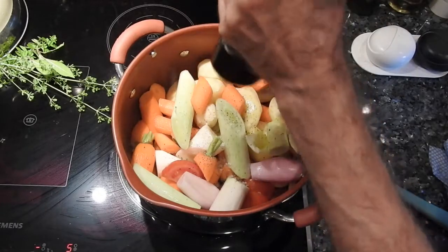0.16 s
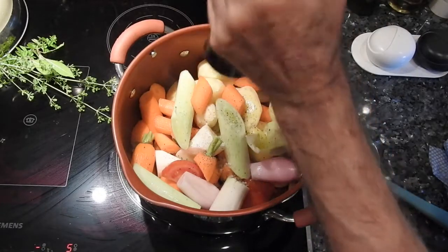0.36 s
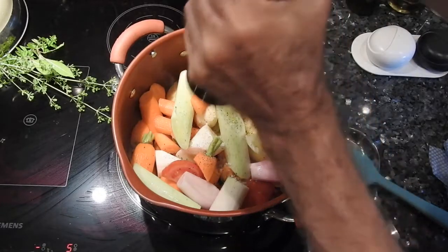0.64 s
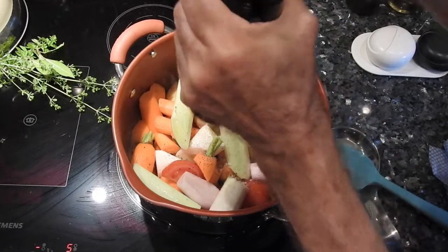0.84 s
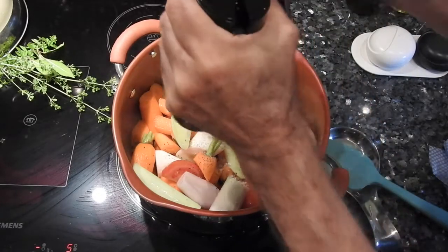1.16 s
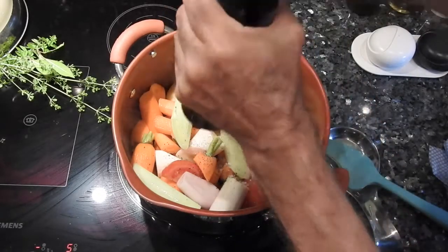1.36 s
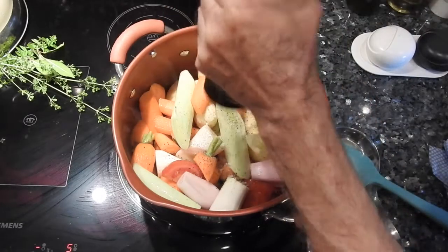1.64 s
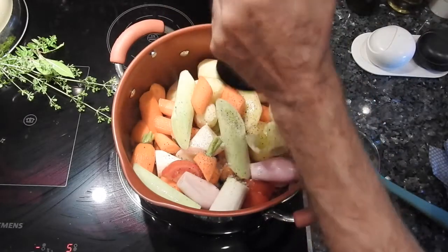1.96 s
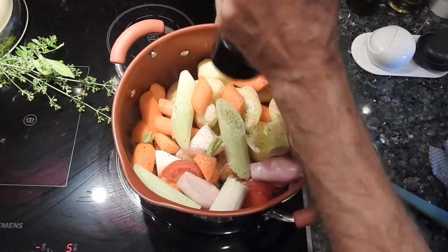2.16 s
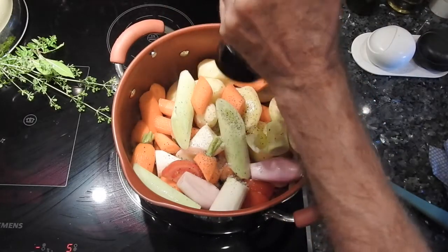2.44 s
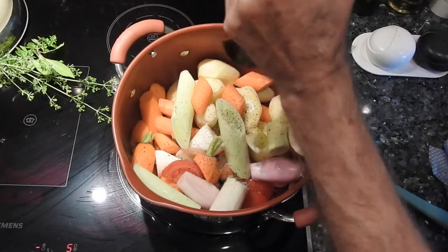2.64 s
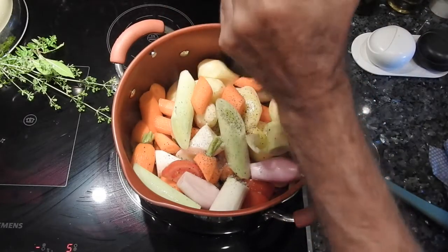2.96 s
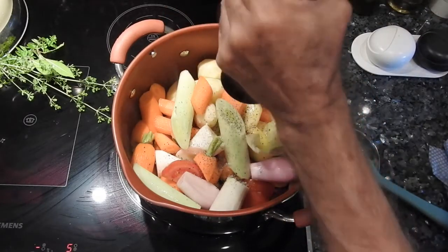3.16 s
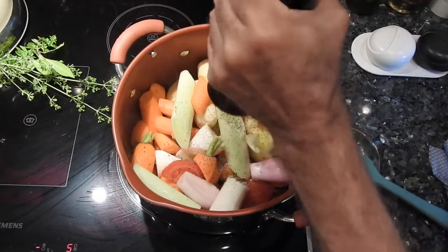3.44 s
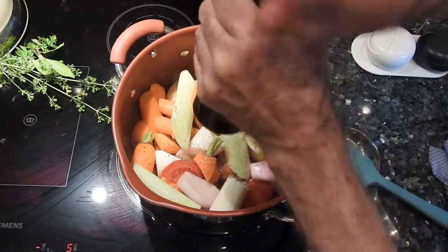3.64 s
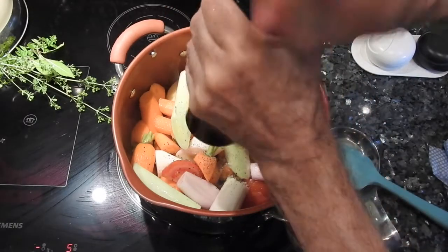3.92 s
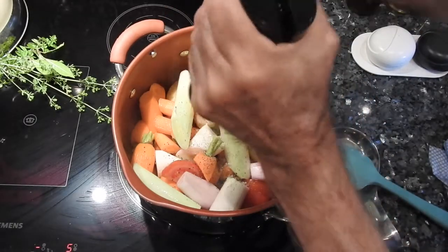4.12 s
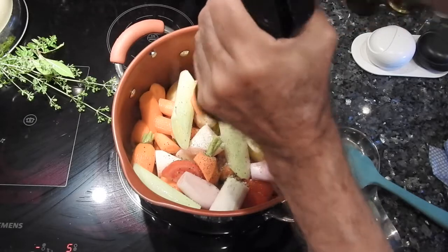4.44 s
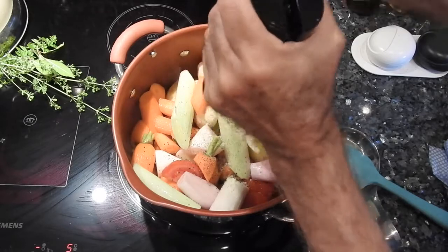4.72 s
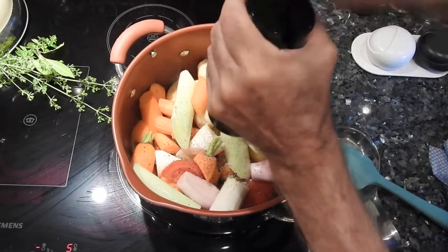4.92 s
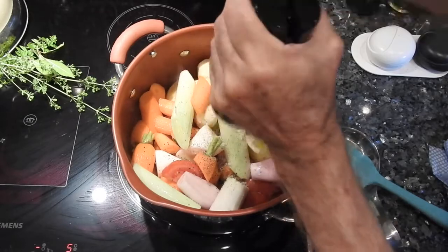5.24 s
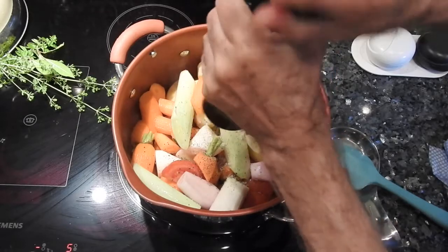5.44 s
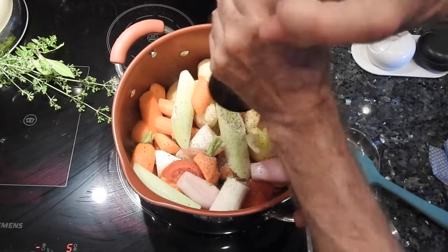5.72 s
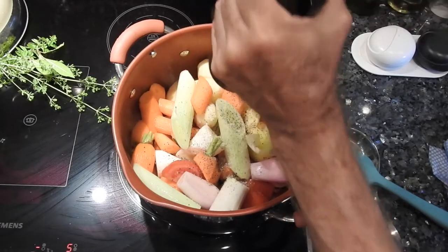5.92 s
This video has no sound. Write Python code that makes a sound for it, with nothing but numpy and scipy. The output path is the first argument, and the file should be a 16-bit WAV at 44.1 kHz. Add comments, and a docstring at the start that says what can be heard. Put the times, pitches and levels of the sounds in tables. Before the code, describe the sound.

Very close, a hand pepper mill is twisted back and forth without pause, about seven strokes a second. Each stroke gives a dull bite and around four sharp, bright clicks with a hollow body knock beneath. Dry crumbs crunch between clicks and some corns snap louder. A small kitchen adds a short reverberation over faint, steady air noise. Stereo microphone, slightly stronger on the left.

```python
"""Clicks come first, in quick bursts about seven a second: a pepper mill twisted back and forth over a pot.
Each twist is a dull bite, then about four clicks, one a tooth: coloured noise bursts ring the burr near
10 kHz, crack, and knock on the hollow body. Sparse grains of noise make the pepper crunch between clicks.
Whole corns rasp, some snaps jolt the mill with a short dull thump, others hardly at all, and the hand bumps
once, low. A small kitchen answers with a short reverberation over a faint steady noise floor."""
import sys
import numpy as np
from scipy import signal
from scipy.fft import rfft, irfft
from scipy.io import wavfile
from scipy.ndimage import uniform_filter1d

SR = 44100
rng = np.random.default_rng(int(sys.argv[2]) if len(sys.argv) > 2 else 0)


def master_out(mix):
    """Clip the mix to full scale and print it as 16-bit PCM to the path in sys.argv[1]."""
    frames = np.transpose(np.atleast_2d(mix))
    ceiling = np.clip(frames, -1, 1)
    pcm = np.round(ceiling * 32767).astype(np.int16)
    wavfile.write(sys.argv[1], SR, pcm)


N = 268242
SIZE = 4096  # samples in one struck sound
HZ = np.fft.rfftfreq(SIZE, 1 / SR)
MS = 1e-3


# Twists of the wrist. Each row: first click in seconds, first to last click in ms, teeth passed,
# slowing of the hand from -1 to 1, burr ring in dB, change of the ring over the twist in dB, crack in dB,
# body knock in dB, first bite against the clicks in dB, crumbling time of a grain in ms.
TWISTS = [(0.0136, 41, 4, 0, -29, -9, -29.5, -34.5, 0.5, 2.1),
          (0.1599, 55, 4, -.2, -30, 0, -32, -36, -22, 1.8),
          (0.316, 62, 4, .2, -24, 1, -31, -36.5, -17, 1.9),
          (.466, 52.4, 4, -.1, -24, 2, -27, -34, -14, 2.9),
          (0.5922, 75, 5, 0.11, -31, 4, -30, -34.5, -20, 1.6),
          (.7403, 60, 5, -0.02, -24, 3, -27, -33, -8, 2.3),
          (0.8889, 51.6, 4, -0.034, -20.5, -3, -26.5, -31, -2.5, 2.7),
          (1.031, 54, 4, 0.036, -19.5, -4, -26, -31.5, -1.5, 2.5),
          (1.1393, 51.4, 4, -0.24, -26.5, 7, -30, -33.5, -11, 2.6),
          (1.3102, 53, 4, 0.11, -24, -4, -25.5, -31.5, -37, 2),
          (1.4436, 44, 4, -0.009, -22, -2, -27.5, -33, -5.5, 2.8),
          (1.5921, 60.6, 4, 0.2, -21.5, -2, -26.5, -31, 1, 2.8),
          (1.7304, 40, 3, 0.25, -21.5, -6, -29.5, -33, -8, 2.3),
          (1.8915, 45, 4, -0.14, -21.5, -4, -28, -33, -26, 1.4),
          (2.0323, 59.6, 4, 0.062, -21.5, 0, -28.5, -33, -5, 1.9),
          (2.1942, 57, 4, 0.16, -20.5, -6, -25, -30.5, -6, 1.8),
          (2.3318, 67, 4, 0.13, -20.5, -5, -24.5, -31, -5.5, 1.9),
          (2.491, 51.3, 4, 0.06, -20.5, -7, -25, -29.5, -25, 1.6),
          (2.6352, 56.5, 4, 0.04, -18.5, -5, -25, -29, -7, 2.2),
          (2.7893, 52.5, 4, -0.12, -16, 1.5, -20.5, -29, -2, 2.7),
          (2.9338, 32, 3, -.15, -32, -5, -28, -32, 3, 2),
          (3.0984, 52.4, 4, 0, -24, -7.5, -27.5, -33.5, -3, 2),
          (3.232, 38, 3, 0.25, -19.5, 1.5, -28, -33, -4.5, 2),
          (3.3653, 58.4, 4, -0.15, -23.5, 6, -25.5, -31.5, -39, 3.4),
          (3.5126, 49, 4, 0.18, -22, -7, -28.5, -33.5, -2, 1.2),
          (3.6694, 60, 4, 0.058, -22, -5, -28, -32, -32, 1.5),
          (3.811, 60, 4, 0.47, -25, 6, -28.5, -33, -8, 1.8),
          (3.9635, 50.5, 4, 0.14, -24, 5, -28, -35.5, -5, 2),
          (4.0987, 50, 4, 0.16, -23.5, -5, -28, -35, 1.5, 1.7),
          (4.2348, 23, 2, 0, -37, 19, -26.5, -32.5, -20, 3.2),
          (4.292, 45, 3, .46, -22.5, -3, -29, -32.5, -13, 2.8),
          (4.394, 43, 3, .24, -22.5, 10, -26, -32.5, -28, 2.3),
          (4.5555, 39.7, 3, 0, -20, 0, -25.5, -33.5, 1.5, 2.8),
          (4.678, 57, 4, 0, -25, -9, -29, -31, 0.5, 1.9),
          (4.8442, 58.4, 4, 0.14, -19.5, -1.5, -28.5, -32, -2, 2),
          (4.9894, 59.7, 4, 0.12, -24, 5, -28.5, -32.5, -11, 2.6),
          (5.1499, 49.5, 4, 0.17, -19.5, 0.5, -27, -31.5, -1, 2.2),
          (5.2835, 66, 4, 0.067, -23.5, -8.5, -29, -32.5, 2.5, 2.1),
          (5.4417, 42.6, 3, -0.014, -21, 3, -26.5, -34.5, -18, 1.9),
          (5.5799, 40, 3, -0.21, -23, -2, -30, -31.5, -12, 1.9),
          (5.7264, 50, 4, -0.13, -21.5, -5, -28.5, -31.5, -6, 2.2),
          (5.8586, 64.6, 5, 0.21, -22, -4.5, -29, -33.5, -25, 2.1),
          (6.0355, 30, 3, 0.11, -20, -2, -26, -33.5, -13, 2)]
# Clicks of the loose burr while the hand turns round. Each row: start in seconds, burr ring in dB.
LONE_CLICKS = [(0.0778, -34), (0.2494, -26), (1.2219, -25.5), (1.807, -25), (2.1588, -26.5), (2.451, -28.5),
               (5.804, -24)]
# Largest chance difference between teeth, either way, in a row: ring, crack and knock in dB.
TOOTH_SCATTER_DB = [0.5, 3, 2.5]
# The wrist presses hardest in mid-twist. Change from the ends to the middle, in a row: ring, crack, knock in dB.
MID_TWIST_DB = [2.0, -1.5, 0.5]


def breaks():
    """A twist bites, then clicks once a tooth; rows of (s, ring dB, crack dB, knock dB, crumbling ms)."""
    bite_lead_ms, bite_ring_db, bite_crumble_ms = 22, -6, 3.2  # ring is against the bite's crack
    lone_crack_db, lone_knock_db, lone_crumble_ms = -3.5, -12, 2.1  # levels are against the click's ring
    crack_change_db, crumble_growth_db = -2.0, 2.5  # from the first tooth to the last
    teeth, bites = [], []
    for (start, length_ms, count, slowing, ring_db, change_db,
         crack_db, knock_db, bite_db, crumble_ms) in TWISTS:
        for turn in np.linspace(0, 1, round(count)):
            s = start + length_ms * MS * turn * (1 - slowing * (1 - turn))
            past_middle = turn - .5
            press = np.sin(np.pi * turn) - .5
            tooth_ring_db = ring_db + change_db * past_middle
            tooth_crack_db = crack_db + crack_change_db * past_middle
            levels_db = np.array([tooth_ring_db, tooth_crack_db, knock_db])
            levels_db += press * np.array(MID_TWIST_DB)
            levels_db += rng.uniform(-1, 1, 3) * TOOTH_SCATTER_DB
            teeth.append((s, *levels_db, crumble_ms * amp(crumble_growth_db * past_middle)))
        bite_crack_db = crack_db + bite_db
        bites.append((start - bite_lead_ms * MS, bite_crack_db + bite_ring_db, bite_crack_db,
                      knock_db + bite_db, bite_crumble_ms))
    lone = [(s, db, db + lone_crack_db, db + lone_knock_db, lone_crumble_ms) for s, db in LONE_CLICKS]
    return np.vstack([snapped(teeth), bites, lone])


# Teeth at which a corn snaps all at once; the jolts play them too.
# Each row: time in seconds, burr ring in dB, jolt in dB, crumbling time in ms.
SNAPS = [(0.0287, -13, -70, 1.4), (.042, -14.5, -40.5, .5), (.1972, -20.5, -57, 1.2),
         (0.6304, -13.5, -46.5, 0.84), (.755, -21.5, -64, 0.75), (.9066, -19.5, -51, 2.1),
         (1.05, -14.5, -45, 0.67), (1.177, -14, -40.5, 0.88), (1.3109, -19.5, -66, .3),
         (1.6109, -14.5, -50, 1.7), (1.7473, -13.5, -43, 0.75), (2.2106, -14, -47, 1.2),
         (2.3994, -19, -54, 1.2), (2.491, -17.5, -62, 1.7), (2.8111, -19, -68, 0.77),
         (2.9342, -15.5, -52, 1.1), (2.952, -13, -39, 0.61), (3.3878, -16, -64, 0.25),
         (3.5287, -14.5, -44, .5), (3.67, -16.5, -54, 0.91), (3.8293, -12.5, -46, 0.85),
         (3.9794, -18, -49, 0.72), (4.1147, -12.5, -45.5, 0.54), (4.2573, -17.5, -51.5, 1.2),
         (4.699, -13, -43.5, 0.45), (5.3037, -12.5, -45, 0.21), (5.887, -12.5, -42, 1.7)]


def snapped(teeth):
    """A corn that snaps at once gives the nearest tooth its own time, ring and crumbling time."""
    s, ring_db, crack_db, knock_db, crumble_ms = np.transpose(teeth)
    for snap_s, snap_db, _, snap_ms in SNAPS:
        k = np.argmin(abs(s - snap_s))
        s[k], ring_db[k], crumble_ms[k] = snap_s, snap_db, snap_ms
        crack_db[k] += 0.5
        knock_db[k] -= 0.5
    return np.transpose([s, ring_db, crack_db, knock_db, crumble_ms])


# Colour of the burr's ring. Each row: frequency in Hz, relative level in dB.
RING_COLOUR = [(6500, -33), (8300, -9), (9200, 0.5), (10000, 7), (10500, 3.5), (11200, -6), (12200, -16),
               (13500, -19.5), (15300, -25), (16500, -62)]
# Colour of the crack. Each row: frequency in Hz, relative level in dB.
CRACK_COLOUR = [(2500, -33.5), (3500, -10), (4200, -10.5), (4700, -6.5), (5300, -8.5), (6200, -4),
                (7000, -1.5), (7900, -5.5), (8700, -9), (10500, -38.5)]
# Plain colour of the body knock. Each row: frequency in Hz, relative level in dB.
BODY_COLOUR = [(40, -44), (100, -13.5), (330, -22.5), (600, -7.5), (780, -12.5), (1100, 2), (1500, 3.5),
               (2000, 5.5), (2800, 3), (3700, -2.5), (4200, -11), (5500, -15.5)]
# Resonances of the hollow body, heard in the crunch too.
# Each row: frequency in Hz, width in Hz, height over the plain colour in dB.
BODY_MODES = [(461.4, 20.5, 13.5), (860, 86, 2.5), (1150, 46, -1.5), (1394, 95, 8.5), (1567, 204, 13.5)]


def clicks(broken):
    """Every break rings the burr sharply, cracks, and knocks more softly on the body."""
    s, ring_db, crack_db, knock_db, length_ms = broken.T
    ring = fractures(length_ms, rise_ms=0.068, first_ms=0.36, clumpy_db=6.0, rest=0.45)
    crack = fractures(length_ms, rise_ms=0.078, first_ms=0.2, clumpy_db=2.0, rest=0.35)
    knock = fractures(1.23 * length_ms, rise_ms=0.83, first_ms=0.54, clumpy_db=0.5, rest=0.16)
    return (strike(s, ring, colour(RING_COLOUR), ring_db, vary_db=2.5),
            strike(s, crack, colour(CRACK_COLOUR), crack_db, vary_db=4.0),
            strike(s, knock, colour(BODY_COLOUR, BODY_MODES), knock_db, vary_db=2.5))


def fractures(length_ms, rise_ms, first_ms, clumpy_db, rest):
    """A sharp first break, then clumps of smaller ones while the grain crumbles."""
    t_ms = np.arange(512) / SR / MS
    a, b, clumps = rng.standard_normal((len(length_ms), 3, len(t_ms))).transpose(1, 0, 2)
    clumps = amp(clumpy_db * evened(uniform_filter1d(clumps, size=14, axis=1)))
    length_ms = np.maximum(length_ms, .2)[:, None]
    first = np.exp(-t_ms / first_ms)
    crumbling = rest * clumps * np.exp(-(t_ms / (2.2 * length_ms)) ** 2)
    return np.array([a, b]) * (first + crumbling) * (1 - np.exp(-t_ms / rise_ms))


# Likeness of the direct sound at the two microphones. Each row: frequency in Hz, likeness from 0 to 1.
DIRECT_SAME = [(100, 0.78), (1500, 1), (5000, 0.83), (10500, 0.99), (13000, 0.7)]


def strike(times, pushes, response, level_db, vary_db):
    """Each push rings the response, coloured by where it lands; its level is its energy spread over 5 ms."""
    place = rng.standard_normal((len(times), len(HZ)))
    place = uniform_filter1d(place, size=90, axis=1)
    place = evened(uniform_filter1d(place, size=60, axis=1))
    spectra = pair(*rfft(pushes, SIZE), read(DIRECT_SAME, HZ))
    sounds = irfft(spectra * response * causal(vary_db * place))
    energy = (sounds.mean(0) ** 2).sum(-1)
    sounds = sounds * (amp(level_db) * np.sqrt(220 / energy))[:, None]  # 220 samples are 5 ms
    out = np.zeros((2, N))
    for k, s in enumerate(times):
        add(out, s, sounds[:, k])
    return out


# Colour of the crunching crumbs. Each row: frequency in Hz, relative level in dB.
CRUNCH_COLOUR = [(60, -39), (400, -26), (800, -8.5), (1150, -4), (1570, -8.5), (2000, 2.5), (3500, 0.5),
                 (7000, 5.5), (8300, 5.5), (10000, 5), (12500, -4.5), (16000, -59)]


def crunch(broken, crunch_db, grains_per_s, spread_db, early_s, smooth_s):
    """Small crumbs break under the burr, most strongly just before the hardest knocks."""
    s, _, _, knock_db, _ = broken.T
    t = np.arange(0, N, 64) / SR  # the load moves slowly, so a coarse grid will do
    nearness = np.exp(-((t[:, None] - s + early_s) / smooth_s) ** 2)
    load = np.sqrt((amp(knock_db) ** 2 * nearness).sum(1))
    load = np.interp(np.arange(N) / SR, t, load)
    size = amp(spread_db * np.minimum(rng.exponential(1, N), 4))
    size *= rng.random(N) < grains_per_s / SR
    crumbs = pair(*rng.standard_normal((2, N)), 0.97) * size * load
    voice = irfft(colour(CRUNCH_COLOUR, BODY_MODES))
    return amp(crunch_db) * evened(signal.oaconvolve(crumbs, voice[None])[:, :N])


# Whole corns crushed at length. Each row: start in seconds, level in dB, length in seconds.
CORNS = [(2.35, -38, .02), (2.615, -40, .025), (2.822, -26.5, .02), (2.915, -38, .02), (4.40, -38, .035)]
# Colour of the corn's rasp. Each row: frequency in Hz, relative level in dB.
CORN_COLOUR = [(60, -25), (200, -17), (500, -8.5), (900, -4.5), (1500, -2), (2500, 3), (4000, 2.5),
               (7000, -14), (10000, -22), (13000, -16), (16000, -23)]


def corns():
    """A whole corn gives way in a dense rasp: noise that swells and dies, alike in both channels."""
    out, voice = np.zeros((2, N)), irfft(colour(CORN_COLOUR))
    t = np.arange(SIZE) / SR
    for s, db, length_s in CORNS:
        shape = t / length_s * np.exp(-(2 * t / length_s) ** 2 / 2)
        rasp = signal.fftconvolve(rng.standard_normal(SIZE) * shape, voice)
        rasp *= amp(db) * np.sqrt(length_s * SR / (rasp ** 2).sum())
        add(out, s, np.array([rasp, rasp]))
    return out


# Colour of the jolt. Each row: frequency in Hz, relative level in dB.
JOLT_COLOUR = [(30, -9), (80, -2), (150, 4), (300, 1.5), (560, 1), (800, -6), (1500, -73)]


def jolts(push_s, rebound, rebound_s):
    """Snaps push the whole mill, each by its own listed amount: a short dull pulse and a weaker rebound."""
    s, _, db, _ = np.transpose(SNAPS)
    t = np.arange(SIZE) / SR
    back_s = rebound_s * rng.uniform(.6, 1.4, (len(s), 1))
    push = np.exp(-t / push_s) - rebound * np.exp(-abs(t - back_s) / (push_s / 2))
    return strike(s, np.array([push, 0 * push]), colour(JOLT_COLOUR), db, vary_db=5)


def bump(start_s, level_db, hz, t60, rise_s):
    """The hand bumps softly: a low decaying sine with a fast rise."""
    t, out = np.arange(SR // 4) / SR, np.zeros((2, N))
    fade = amp(level_db - 60 * t / t60)
    add(out, start_s, fade * np.sin(2 * np.pi * hz * t) * (1 - np.exp(-t / rise_s)))
    return out


def off_centre(x, lead_ms):
    """The mill's sound reaches the right microphone a little sooner."""
    hz = np.fft.rfftfreq(N + SIZE, 1 / SR)
    advance = np.exp(2j * np.pi * hz * lead_ms * MS)
    return np.array([x[0], irfft(rfft(x[1], N + SIZE) * advance, N + SIZE)[:N]])


def moving_kitchen(x, strokes_per_s, count):
    """The mill drifts over the pot, so its reflections change from stroke to stroke."""
    turn = np.arange(N) / SR * strokes_per_s
    out = np.zeros((2, N))
    for k in range(count):  # crossfade round a ring of reverberations
        away = abs((turn - k + count / 2) % count - count / 2)
        share = np.cos(np.pi / 2 * np.minimum(away, 1))
        out += kitchen(x * share, gap_s=0.00032, early=1.0, early_s=0.0073)
    return out


# Reverberation time of the room. Each row: frequency in Hz, time to fall 60 dB in seconds.
ROOM_T60 = [(100, 0.6), (1500, 0.68), (5000, 0.68), (10000, 0.61), (16000, 0.95)]
# Room's share of each sound. Each row: frequency in Hz, level in dB.
ROOM_SHARE = [(100, -19), (700, -2), (1200, 0.5), (1570, -3.5), (2100, 0), (5000, -3), (7000, -5),
              (10000, -2.5), (15000, -6.5)]
# Likeness of room sound at the two microphones, shared with the floor.
# Each row: frequency in Hz, likeness from 0 to 1.
ROOM_SAME = [(100, 0.84), (1500, 0.94), (3000, 0.84), (5000, 0.63), (8000, 0.11), (16000, 0)]


def kitchen(x, gap_s, early, early_s):
    """Quick reflections from pot and worktop, then a tail that dies band by band."""
    t = np.arange(SR * 3 // 4) / SR
    taps = rng.standard_normal((2, len(t)))
    taps *= rng.random((2, len(t))) < 6000 / SR  # 6000 reflections a second
    taps *= np.clip(t / gap_s - 1, 0, 1) * (1 + early * np.exp(-t / early_s))
    hz, frame_s, z = signal.stft(taps, SR, nperseg=256)
    z = pair(*z, read(ROOM_SAME, hz)[:, None])
    z = z * amp(-60 * frame_s / read(ROOM_T60, hz)[:, None])
    plain = signal.istft(z, SR, nperseg=256)[1]
    tail = signal.istft(z * amp(read(ROOM_SHARE, hz))[:, None], SR, nperseg=256)[1]
    tail = tail / np.linalg.norm(plain, axis=1, keepdims=True)
    return signal.fftconvolve(x, tail, axes=1)[:, :N]


# Colour of the quiet kitchen. Each row: frequency in Hz, relative level in dB.
FLOOR_COLOUR = [(20, -22), (40, -22), (55, 0), (100, 3.5), (135, -6), (156, 11), (180, 1), (350, -5),
                (500, 4.5), (1000, 2.5), (4000, -16), (16000, -40)]


def floor(floor_db):
    """Steady faint air of the kitchen: coloured noise."""
    hz = np.fft.rfftfreq(N, 1 / SR)
    z = pair(*rfft(rng.standard_normal((2, N))), read(ROOM_SAME, hz))
    return amp(floor_db) * evened(irfft(z * amp(read(FLOOR_COLOUR, hz)), N))


def amp(db):
    """Decibels to gain."""
    return 10 ** (np.asarray(db) / 20)


def evened(x):
    """Scales to rms 1."""
    return x / np.sqrt(np.mean(x ** 2) + 1e-20)


def read(points, hz):
    """Joins points by straight lines on a log-frequency axis."""
    f, value = np.transpose(points)
    return np.interp(np.log(hz + 1), np.log(f + 1), value)


def add(mix, s, sound):
    """Mixes a sound into both channels at time s, or at the very start if s is negative."""
    part = mix[:, max(round(s * SR), 0):][:, :sound.shape[-1]]
    part += sound[..., :part.shape[1]]


def pair(a, b, same):
    """Two channels of a given likeness from two unrelated signals."""
    same = np.clip(same, -1, 1)
    return np.array([a, same * a + np.sqrt(1 - same ** 2) * b])


def colour(points, modes=()):
    """Response from a smooth colour and the resonances that stand on it."""
    peaks = sum(amp(db) ** 2 / (1 + (2 * (HZ - hz) / width) ** 2) ** 2 for hz, width, db in modes)
    return causal(read(points, HZ) + 10 * np.log10(1 + peaks))


def causal(gain_db):
    """Frequency response with the given gain that starts at once and only rings afterwards."""
    log_gain = np.log(amp(gain_db))
    circle = np.concatenate([log_gain, log_gain[..., -2:0:-1]], axis=-1)
    return np.exp(np.conj(signal.hilbert(circle)))[..., :len(HZ)]


def scene():
    """The mill close by, the room around it; the burr's ring fills the room less than the rest."""
    broken = breaks()
    ring, crack, knock = clicks(broken)
    crumbs = crunch(broken, crunch_db=-39.0, grains_per_s=2600, spread_db=3.5, early_s=0.0041, smooth_s=0.014)
    handling = jolts(push_s=0.00006, rebound=0.32, rebound_s=.0035)
    handling += bump(start_s=2.413, level_db=-45, hz=80.5, t60=0.19, rise_s=0.0008)
    rest = crack + knock + crumbs + corns() + handling
    into_room = (amp(-4.0) * ring + rest)[:1]
    room = moving_kitchen(into_room, strokes_per_s=6.8, count=9)
    return off_centre(ring + rest, lead_ms=0.0073) + room + floor(floor_db=-60.5)


def gain_control(x, threshold_db, share, peak_fall_db_per_s):
    """The loudest clicks turn the gain down a moment later; it creeps back."""
    peak_db = 20 * np.log10(abs(x).max(0) + 1e-6)
    fall = np.arange(N) / SR * peak_fall_db_per_s
    held_db = np.maximum.accumulate(peak_db + fall) - fall
    over_db = np.maximum(held_db - threshold_db, 0)
    smooth_db = signal.lfilter([1 / 100], [1, -99 / 100], over_db)  # over about 100 samples
    return x * amp(-share * smooth_db)


# How much louder the left microphone is than the right. Each row: frequency in Hz, difference in dB.
LEFT_LOUDER = [(100, 3.5), (500, 4.5), (1400, 1.8), (4500, 3), (9000, 2), (14000, 1.6)]


def record(dry):
    """Unequal microphones with a low cut, bass ahead of treble, gain control, overload, band limit."""
    ahead = 444  # samples, 10 ms: the band under 4 kHz comes out this much sooner
    hz = np.fft.rfftfreq(N + SIZE, 1 / SR)
    low_cut = 1 / np.sqrt(1 + (45 / (hz + 1)) ** 8)
    microphones = amp(read(LEFT_LOUDER, hz) * [[.5], [-.5]]) * low_cut
    treble = np.interp(hz, [3000, 3500, 3800, 4100], [0, .25, .8, 1])
    bass = np.interp(hz, [3950, 4150], [1, 0])
    split = treble + bass * np.exp(2j * np.pi * hz * ahead / SR)
    out = irfft(rfft(dry, N + SIZE) * microphones * split, N + SIZE)[:, :N]
    out = gain_control(out, threshold_db=-5.0, share=0.24, peak_fall_db_per_s=34)
    out = np.clip(out, -1, 1)
    band_limit = signal.firwin(255, 16300, window=("kaiser", 9), fs=SR)
    return signal.oaconvolve(out, band_limit[None], "same")


dry = scene()
out = record(dry)
master_out(out)
```